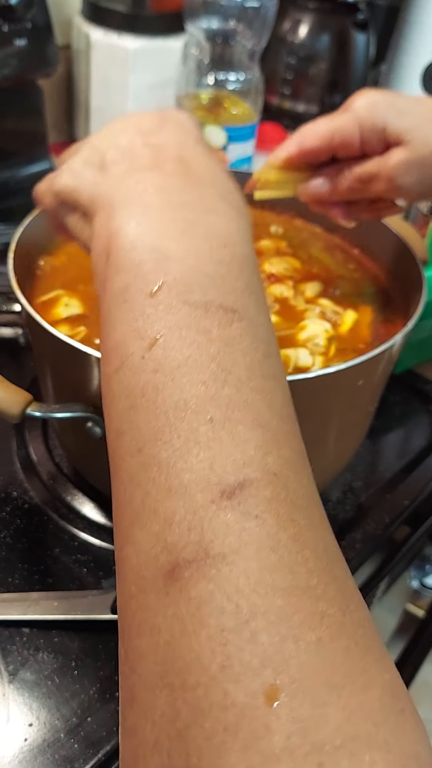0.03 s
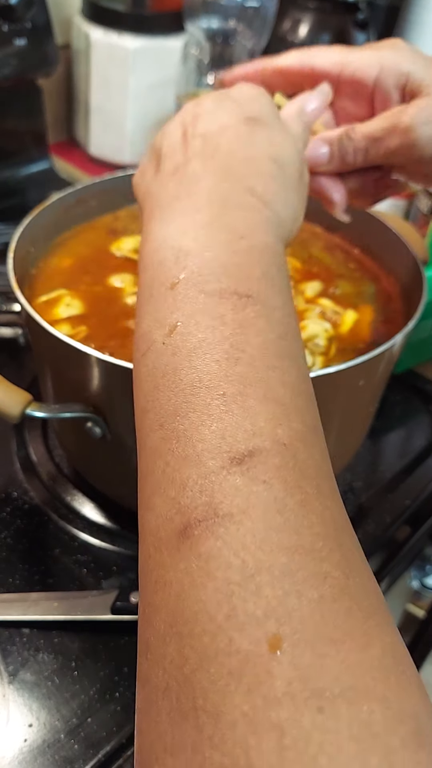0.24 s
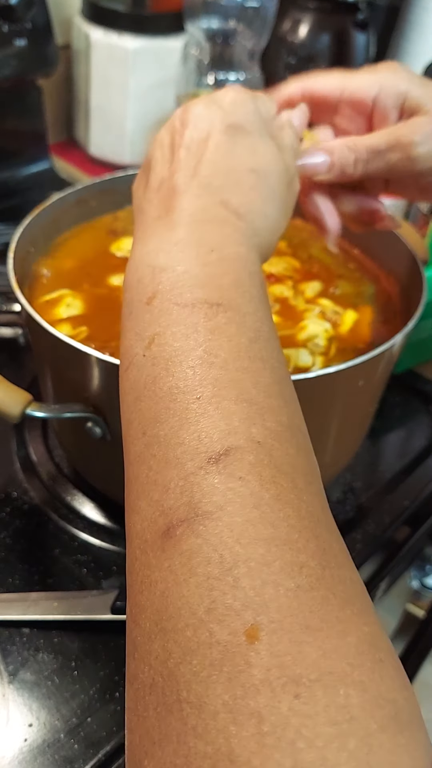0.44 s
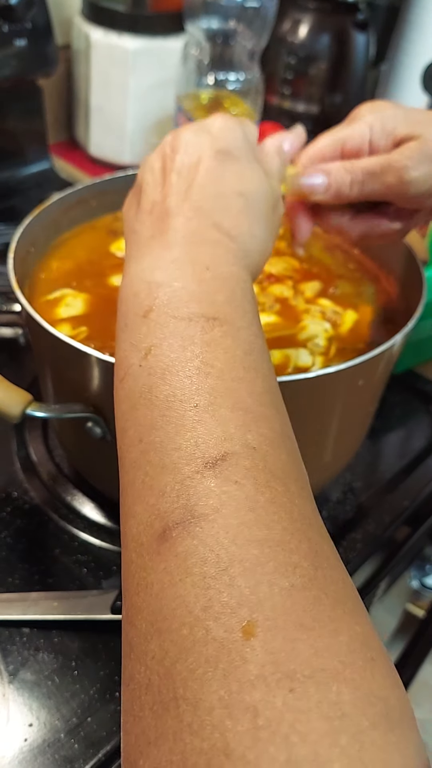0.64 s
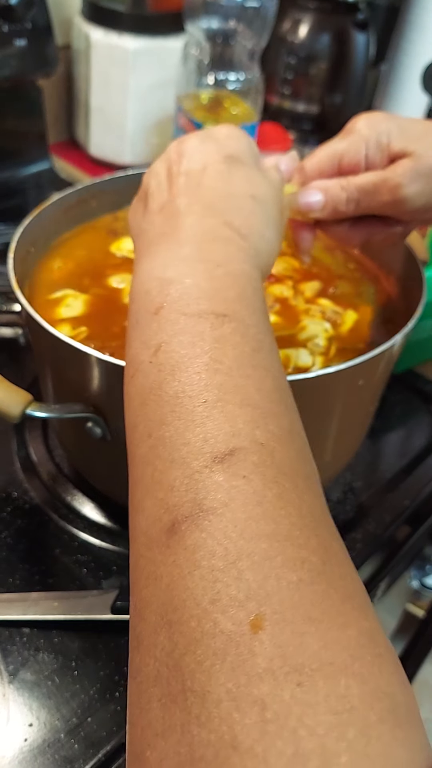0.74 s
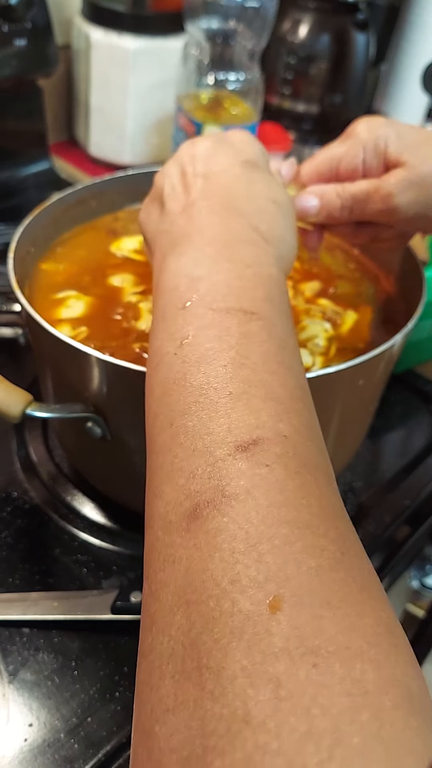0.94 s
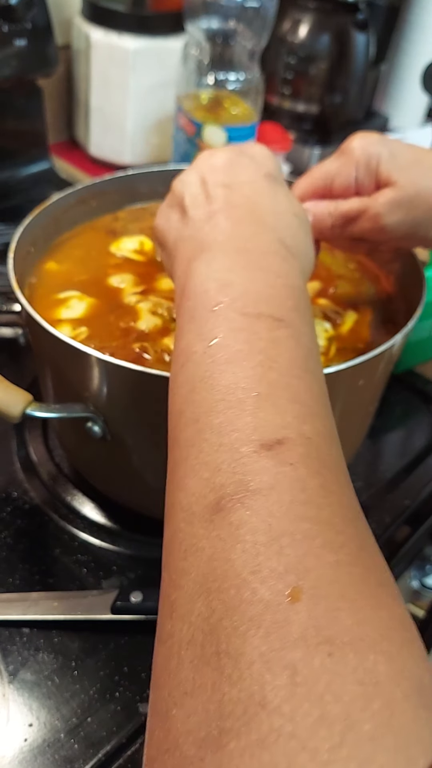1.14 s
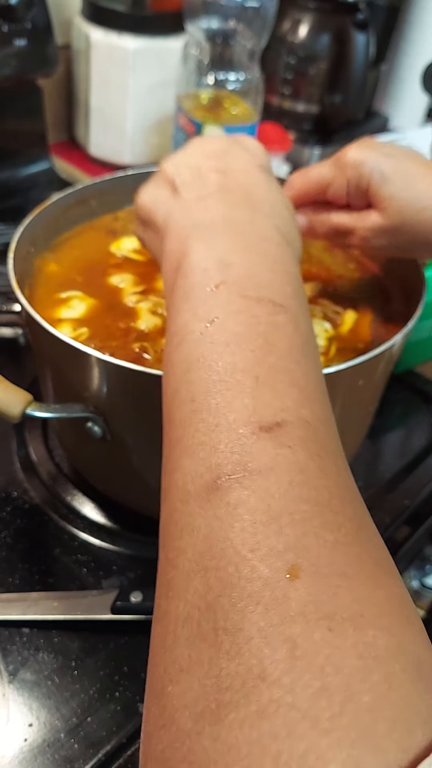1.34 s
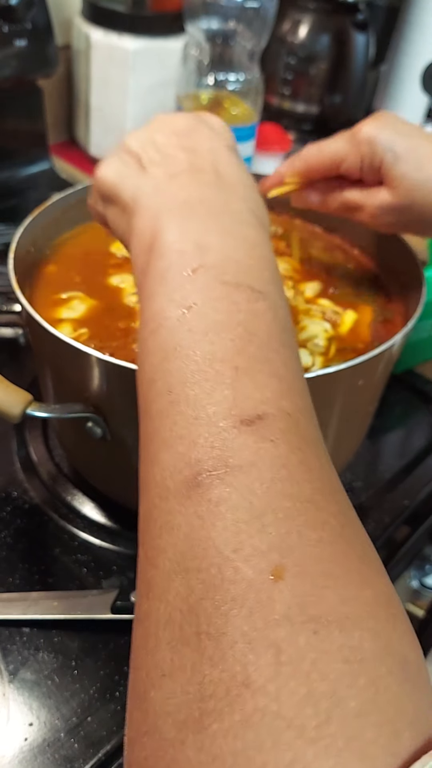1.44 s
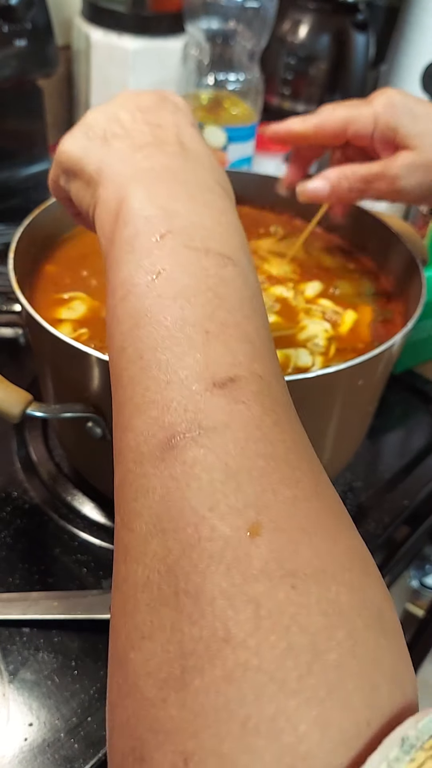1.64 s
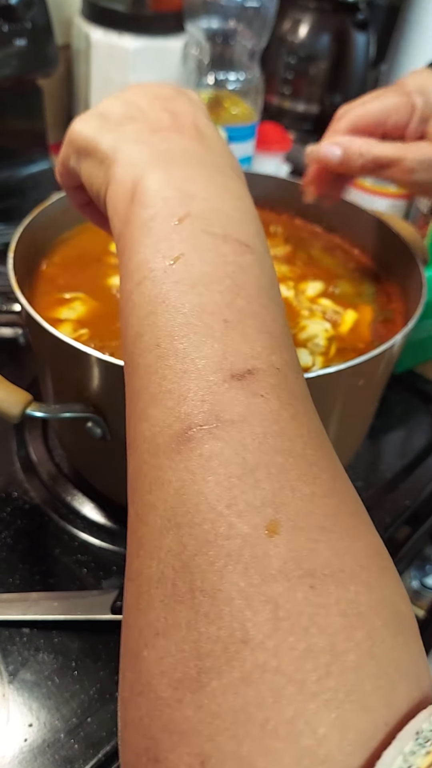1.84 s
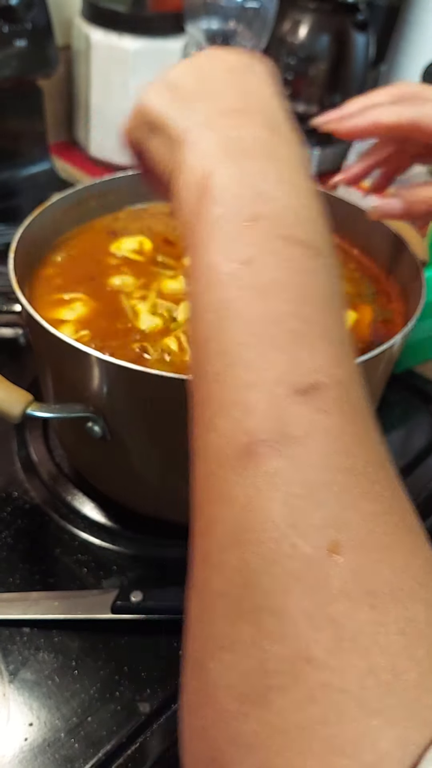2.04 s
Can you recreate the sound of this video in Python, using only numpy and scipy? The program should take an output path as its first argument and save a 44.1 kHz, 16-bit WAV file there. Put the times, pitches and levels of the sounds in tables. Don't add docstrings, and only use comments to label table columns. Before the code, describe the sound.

A bundle of brittle dry noodles cracks and snaps close up in a humming kitchen

```python
import sys
import numpy as np
from scipy import signal
from scipy.io import wavfile

SR = 44100
rng = np.random.default_rng(int(sys.argv[2]) if len(sys.argv) > 2 else 0)


def how_loud(loudness_db):
    steps = np.asarray(loudness_db, float) / 20
    return 10 ** steps


def output_pcm(signal):
    pcm = np.clip(np.atleast_2d(signal).T, -1, 1) * 32767
    wavfile.write(sys.argv[1], SR, np.round(pcm).astype(np.int16))


N = 91287


def evened(x):
    return x / np.sqrt(np.mean(x ** 2) + 1e-20)


def read(points, hz):
    f, value = np.transpose(points)
    return np.interp(np.log(hz + 1), np.log(f + 1), value)


def curve(points):
    return np.interp(np.arange(N) / SR, *np.transpose(points))


def add(mix, s, sound):
    part = mix[..., round(s * SR):][..., :sound.shape[-1]]
    part += sound[..., :part.shape[-1]]


def colour(x, points):
    hz = abs(np.fft.fftfreq(2048, 1 / SR))
    log = np.log(how_loud(np.maximum(read(points, hz), -70)))
    taps = np.fft.ifft(np.exp(np.conj(signal.hilbert(log)))).real[:512]
    return signal.oaconvolve(x, taps[None] / np.linalg.norm(taps), axes=1)[:, :N]


def drift(top_hz):
    t = np.arange(N) / SR
    rates = np.geomspace(top_hz / 20, top_hz, 12)
    return evened(sum(np.sin(2 * np.pi * (f * t + rng.random())) / np.sqrt(f) for f in rates))


def sides(pan_db):
    return how_loud(np.array([[.5], [-.5]]) * pan_db)


def cracks():
    # start in seconds, then peak, low share and middle share in dB.
    crumbs = [(0.0283, -48, -11, -4.5), (0.135, -55.5, -15, -5), (0.2724, -51.5, -8, -3),
              (0.2897, -54, -4, -3), (0.342, -40, -18, -12), (0.681, -49, -18, -5),
              (0.6978, -45.5, -21.5, -6), (0.795, -55, -9, -6.5), (0.8694, -63, -16, -4),
              (0.8866, -48.5, -10, -37), (1.3678, -49, -31, -16), (1.432, -70, -17, -31.5),
              (1.461, -50, -22.5, -9.5), (1.5131, -46.5, -19.5, -8), (1.5397, -47.5, -22, -12),
              (1.5644, -56, -13, -5), (1.594, -52, -37, -8), (1.6556, -47.5, -33, -23),
              (1.6632, -46, -35, -15), (1.686, -39.5, -10.5, -6.5), (1.6904, -52, -31, -16),
              (1.6977, -52, -21, -18), (1.7048, -40.5, -17.5, -16), (1.8619, -46, -15.5, -8),
              (1.8774, -44, -15.5, -4.5), (1.8865, -51.5, -19, -5), (1.8946, -48.5, -12.5, -4)]
    # start in seconds, then peak, low and middle share in dB.
    snaps = [(0.3987, -34, -17.5, -3.5), (0.7605, -33.5, -20, -11.5), (0.9105, -30.5, -11.5, -5.5),
             (0.9345, -17.5, -24.5, -11), (1.151, -8, -29.5, -15), (1.1544, -19, -36, -13),
             (1.1632, -21, -13.5, 3.5), (1.1667, -12.5, -18.5, -3.5), (1.1717, -24, -25.5, -3),
             (1.1826, -12.5, -33.5, -12), (1.182, -9.5, -40, -16.5), (1.187, -22.5, -52, -0.5),
             (1.7162, -28.5, -18.5, -6), (1.7268, -36, -19, -12)]
    # frequency in Hz, level in dB per Hz.
    bright_tone = [(5000, -36.5), (8000, -1), (10000, 0.5), (11800, 6.5), (13500, 5), (15300, 4),
                   (17000, 1.5)]
    middle_tone = [(2500, -30), (4200, -8.5), (4900, -3), (5600, -6.5), (6700, -2.5), (9000, 0.5),
                   (12000, -23)]
    dull_tone = [(500, -9), (1300, -2), (2400, -3), (3200, -1), (4000, -4.5), (6000, -25)]
    burst_s, splinter_s, splinters_per_s = .00028, .0045, 6000
    crumb_splinter_db, snap_splinter_db = -1, -14

    rows = [(*row, crumb_splinter_db) for row in crumbs] + [(*row, snap_splinter_db) for row in snaps]
    bright, middle, dull = np.zeros((3, 4, N))
    t = np.arange(1200) / SR
    draws = rng.standard_normal((len(rows), 1200))
    odds = rng.random((len(rows), 1200))
    burst = (t / burst_s) * np.exp(1 - t / burst_s)
    for k, ((s, db, low_db, middle_db, splinter_db), noise, odd) in enumerate(zip(rows, draws, odds)):
        hits = (odd < splinters_per_s / SR) * np.sqrt(SR / splinters_per_s)
        splinters = how_loud(splinter_db) * np.exp(-t / splinter_s) * hits
        same_energy = np.linalg.norm(burst) / np.linalg.norm(noise * burst)
        sound = noise * (burst * same_energy + splinters)
        click = np.linalg.norm(sound, keepdims=True)
        spot = 1 + k % 3
        for part, part_db in (bright, 0), (middle, middle_db + 2), (dull, low_db + 4.5):
            add(part[0], s, sound * how_loud(db + part_db))
            add(part[spot], s, click * how_loud(db + part_db))
    return colour(bright, bright_tone) + colour(middle, middle_tone) + colour(dull, dull_tone)


def puffs():
    # start in seconds, level in dB, swing in Hz, fade in seconds.
    pushes = [
        (1.1674, -15, 88, .0065),
        (1.1752, -24, 48, .024),
    ]
    knock_s, knock_db, knock_hz, knock_fade_s = 1.1675, -9.5, 520, .0007
    right_db = -30
    out, t = np.zeros(N), np.arange(4000) / SR
    for s, db, hz, fade in pushes:
        swing = np.sin(2 * np.pi * hz * t + np.pi / 4) * np.exp(-t / fade)
        add(out, s, how_loud(db) * swing * np.minimum(t / .0006, 1))
    knock = np.sin(2 * np.pi * knock_hz * t) * np.exp(-t / knock_fade_s)
    add(out, knock_s, how_loud(knock_db) * knock)
    return out * how_loud([[0], [right_db]])


def kitchen(x):
    # frequency in Hz, time to fall 60 dB in seconds.
    decay = [(1000, 0.38), (3000, 0.47), (6000, 0.41), (11000, 0.29), (16000, 0.25)]
    delay_s = 0.00095
    length = SR // 2
    taps = np.zeros((2, length))
    at = np.arange(0, length - 6, 6) + rng.integers(0, 6, (2, (length - 1) // 6))
    np.put_along_axis(taps, at, rng.choice([-1., 1.], at.shape), 1)
    taps = taps * np.clip(np.arange(length) / SR / delay_s - 1, 0, 1)
    hz, t, z = signal.stft(taps, SR, nperseg=128)
    z = z * how_loud(-60 * t / read(decay, hz)[:, None])
    tail = signal.istft(z, SR, nperseg=128)[1]
    return signal.fftconvolve(x[None], tail / np.linalg.norm(tail[0]), axes=1)[:, :N]


def rub():
    # time in seconds, level in dB.
    effort = [(0, -54), (.1, -80), (.16, -61), (.3, -75), (.46, -74), (.53, -58), (.66, -75), (.8, -67),
              (.87, -90), (1.1, -75), (1.4, -69), (1.55, -63), (1.63, -70), (1.71, -54), (1.78, -74),
              (1.84, -82), (1.9, -69), (2.05, -98)]
    # frequency in Hz, level in dB per Hz.
    tone = [(2500, -15), (4000, -16.5), (4800, -4.5), (5800, -10), (10000, -9), (12500, -4), (15500, -4.5),
            (17000, -3)]
    ticks_per_s, spread_db, flicker_db, pan_db = 6400, 3.0, 1.5, 9.5
    size = how_loud(spread_db * np.minimum(rng.exponential(1, (2, N)), 4))
    ticks = size * rng.standard_normal((2, N)) * (rng.random((2, N)) < ticks_per_s / SR)
    level = how_loud(curve(effort) + flicker_db * drift(30))
    return evened(colour(ticks, tone)) * level * sides(pan_db)


def hum():
    # frequency in Hz, rms in dB, left-right in dB, left lead in radians, waver in dB.
    mains = [(120, -50, 3, .2, .6), (240, -50.5, .6, .4, .6), (360, -63.5, -3, .35, .8),
             (480, -65.5, .2, .5, .8), (600, -76, .3, .8, 1.5), (720, -72, -4, .9, 1.5)]
    # multiple of fan tone, rms in dB, left-right in dB, left lead in radians, waver in dB.
    fan_tones = [(1, -44.5, 2.1, .1, .8), (4.479, -63, -6, .9, 1.5)]
    # time in seconds, frequency in Hz.
    fan_hz = [(0, 110.95), (.6, 110.95), (.9, 110.62), (2.07, 110.6)]
    beat_peak_s = .058
    t = np.arange(N) / SR - beat_peak_s
    fan = np.cumsum(curve(fan_hz)) / SR
    fan = fan - np.interp(0, t, fan)
    turns = [hz * t for hz, *_ in mains] + [order * fan for order, *_ in fan_tones]
    out = np.zeros((2, N))
    for k, (turn, (_, db, pan_db, lead, waver_db)) in enumerate(zip(turns, mains + fan_tones)):
        locked = k % len(mains) == 0
        start = (not locked) * rng.uniform(0, 2 * np.pi) + np.array([[lead], [0]])
        level = np.sqrt(2) * how_loud(db + waver_db * drift(4.41))
        out += level * sides(pan_db) * np.cos(2 * np.pi * turn + start)
    return out


def air():
    # frequency in Hz, level in dB.
    tone = [(25, -19.5), (55, -8.5), (95, -10), (170, -5), (310, -5), (900, -17), (2200, -28),
            (16000, -42.5)]
    # frequency in Hz, left-right correlation from -1 to 1.
    likeness = [(60, 0.7), (180, 1), (550, 0.33), (1650, -0.19), (4970, 0.077), (15000, -0.75)]
    # frequency in Hz, left-right difference in dB.
    lean = [(60, -30.5), (180, -4), (550, -1.5), (1650, 4), (4970, 4), (15000, 2.5)]
    level_db, swell_db = -51, .5
    frames, hz = N // 256 + 5, np.fft.rfftfreq(1024, 1 / SR)
    a, b, c, d = rng.standard_normal((frames, 513, 4)).T
    same = np.clip(read(likeness, hz), -1, 1)[:, None]
    left = a + 1j * b
    right = same * left + np.sqrt(1 - same ** 2) * (c + 1j * d)
    z = np.array([left, right]) * how_loud(read(tone, hz)[:, None]) * sides(read(lean, hz))[..., None]
    roar = signal.istft(z, nperseg=1024, noverlap=768)[1][:, :N]
    return how_loud(level_db + swell_db * drift(6.5)) * evened(roar)


def scene():
    # time in seconds, gain in dB.
    gain = [(0, -1), (.03, 0.5), (.7, 0.9), (.9, 2.5), (1.05, 5.5), (1.14, 4.5), (1.2, -1.5), (1.6, -1),
            (2.03, -1), (2.07, -2.)]
    room_db, room_pan_db = -7, 2
    echo_s, echo_db, echo_pan_db = .0045, -20, 9
    shadow_db = 20
    near, *spots = cracks()
    room = how_loud(room_db) * sides(room_pan_db) * sum(kitchen(spot) for spot in spots)
    add(room, echo_s, near * how_loud(echo_db) * sides(echo_pan_db))
    noodles = near * how_loud([[0], [-shadow_db]]) + room + puffs() + rub()
    return noodles + how_loud(curve(gain)) * (hum() + air())


def roll_off(x):
    return signal.sosfilt(signal.butter(12, 17150, fs=SR, output="sos"), x)


def record(dry):
    mic_low_hz, edge_hz, edge_db, top_hz, fade_out_s = 45, 15800, -24, 16900, .006
    fade = np.minimum(np.arange(N)[::-1] / SR / fade_out_s, 1)
    bass_cut = signal.butter(2, mic_low_hz, "high", fs=SR, output="sos")
    cut = signal.sosfilt(bass_cut, dry * fade)
    low, top = (signal.firwin(511, hz, window=("kaiser", 8), fs=SR) for hz in (edge_hz, top_hz))
    step = low + how_loud(edge_db) * (top - low)
    return roll_off(signal.oaconvolve(cut, step[None], "same"))


dry = scene()
out = record(dry)
output_pcm(out)
```